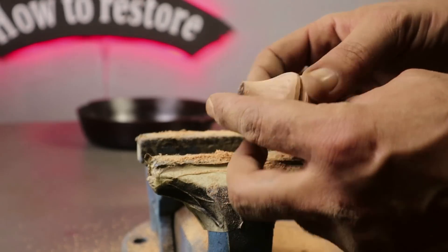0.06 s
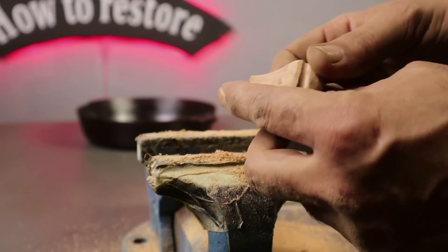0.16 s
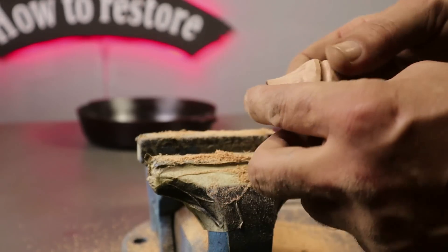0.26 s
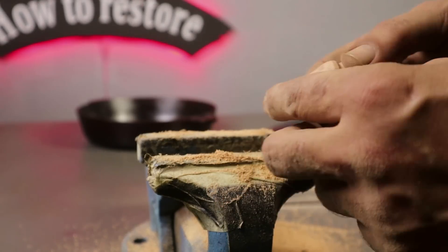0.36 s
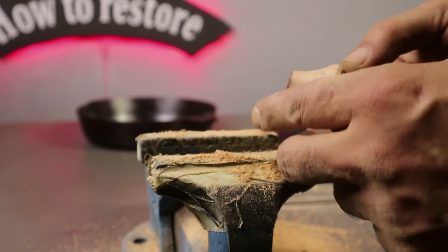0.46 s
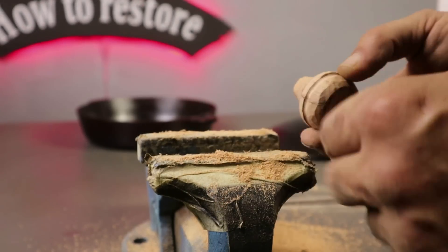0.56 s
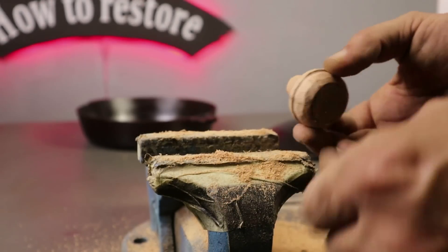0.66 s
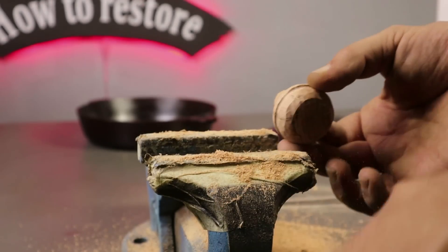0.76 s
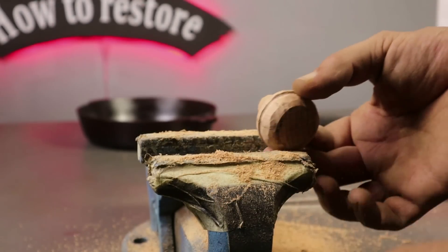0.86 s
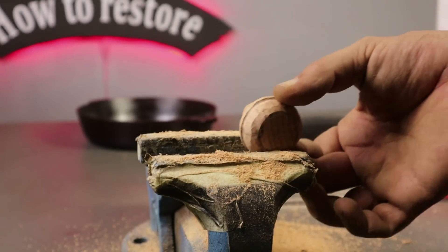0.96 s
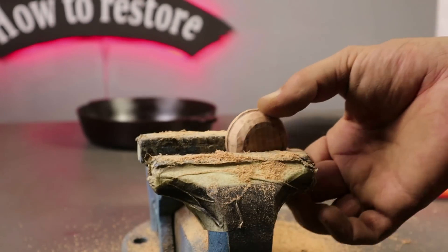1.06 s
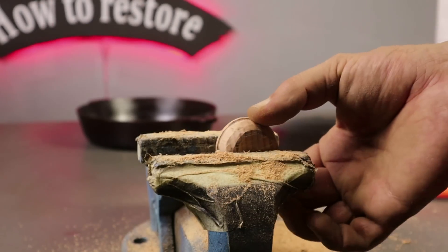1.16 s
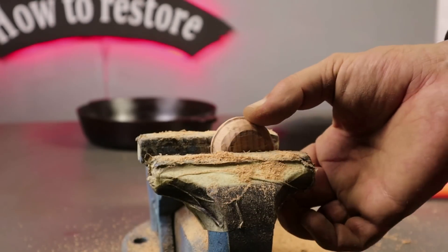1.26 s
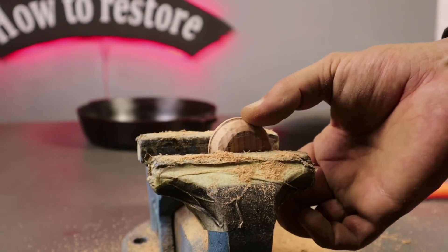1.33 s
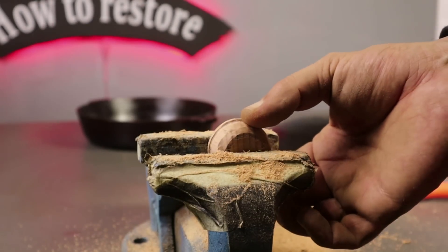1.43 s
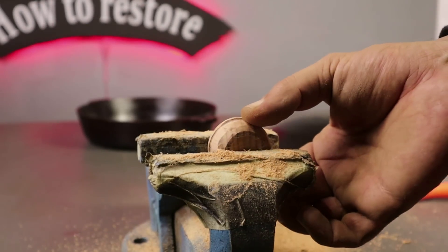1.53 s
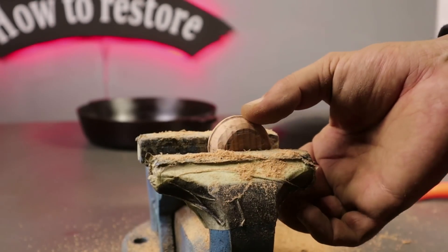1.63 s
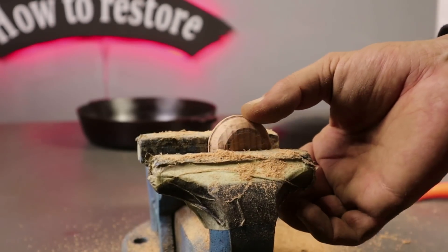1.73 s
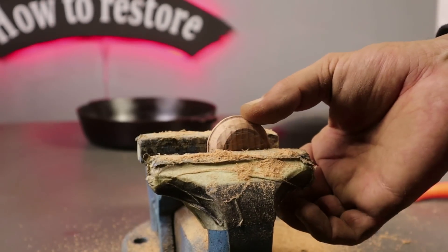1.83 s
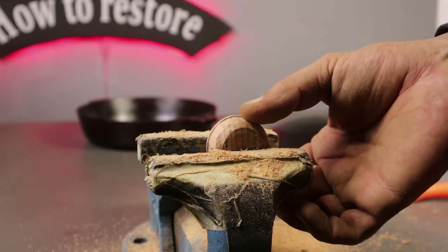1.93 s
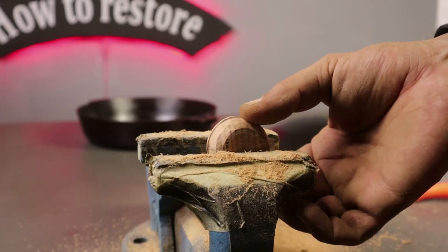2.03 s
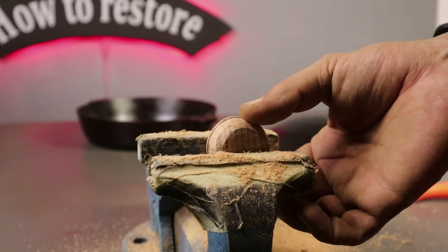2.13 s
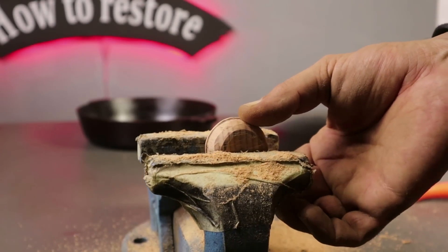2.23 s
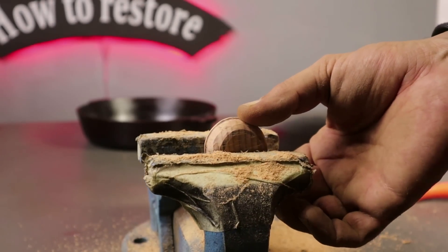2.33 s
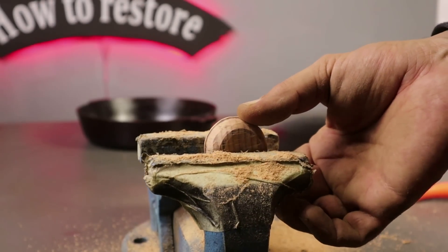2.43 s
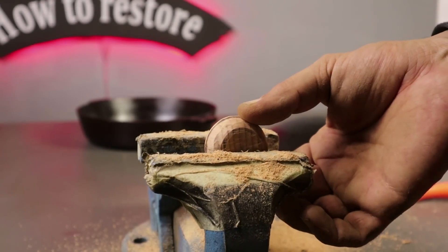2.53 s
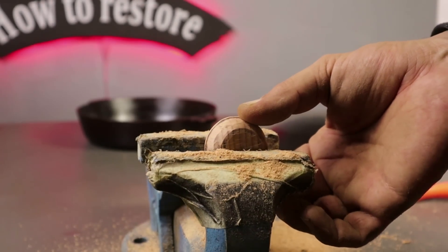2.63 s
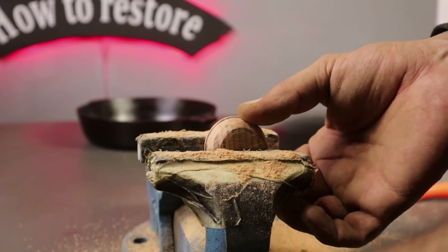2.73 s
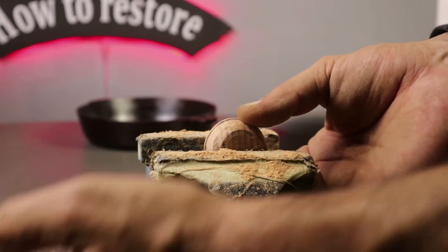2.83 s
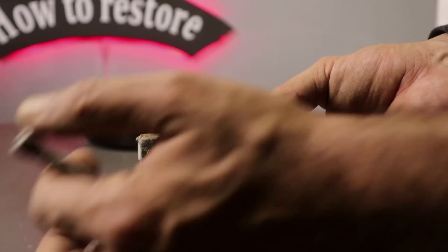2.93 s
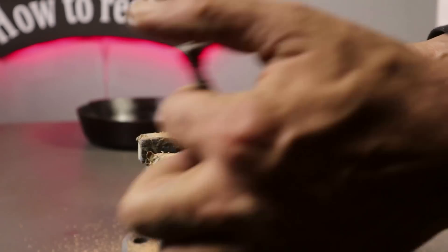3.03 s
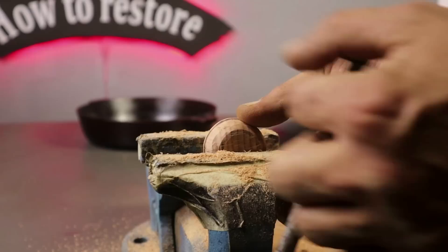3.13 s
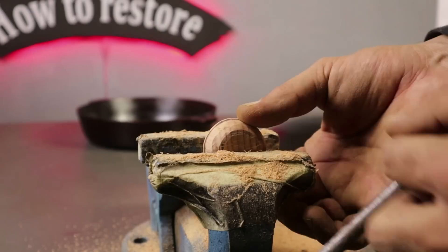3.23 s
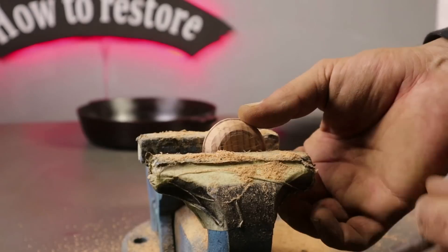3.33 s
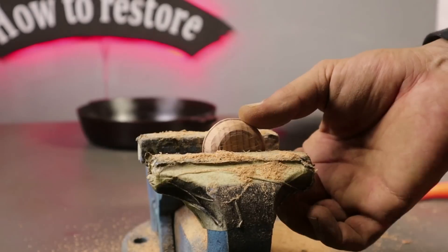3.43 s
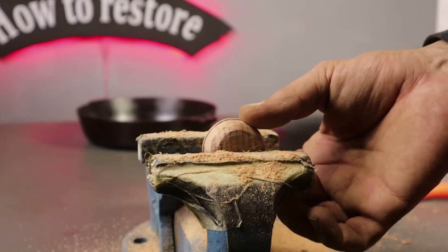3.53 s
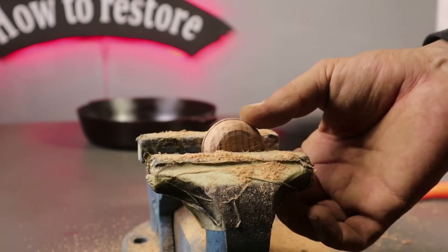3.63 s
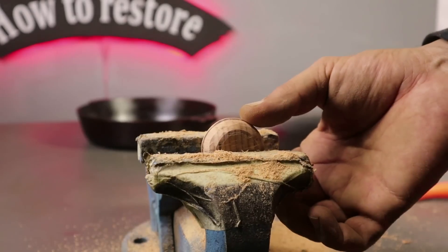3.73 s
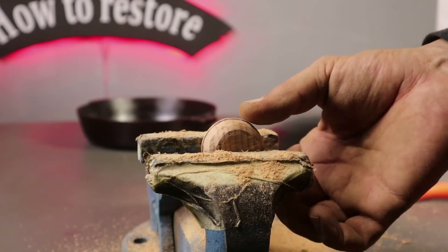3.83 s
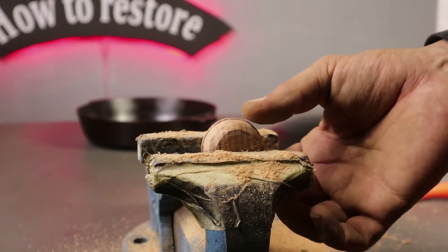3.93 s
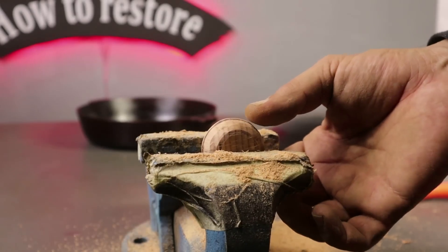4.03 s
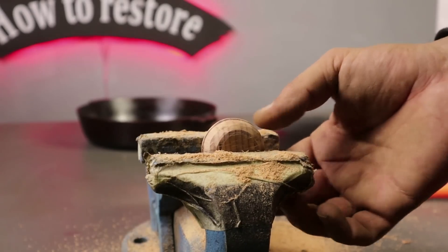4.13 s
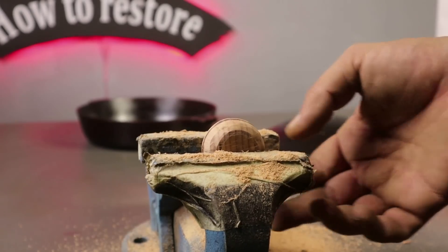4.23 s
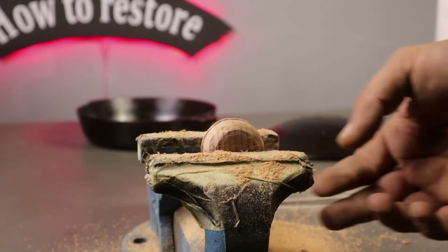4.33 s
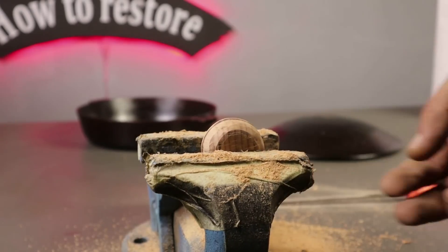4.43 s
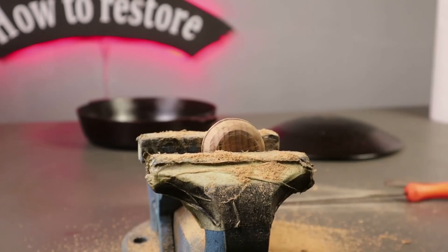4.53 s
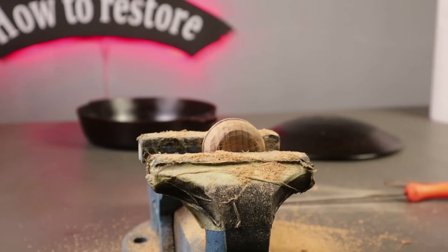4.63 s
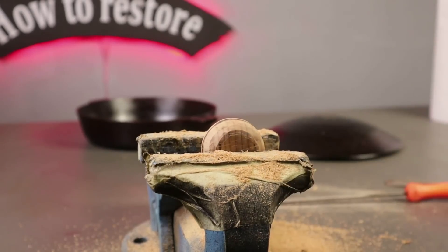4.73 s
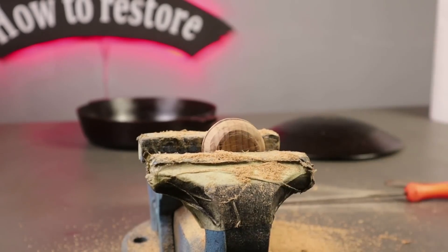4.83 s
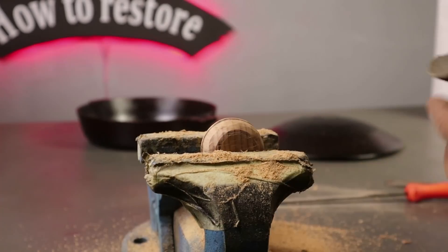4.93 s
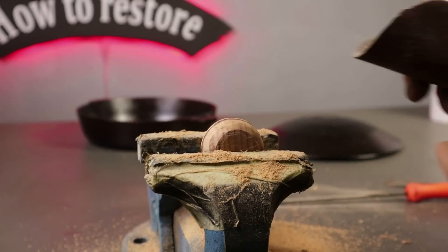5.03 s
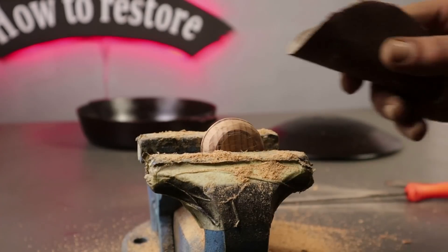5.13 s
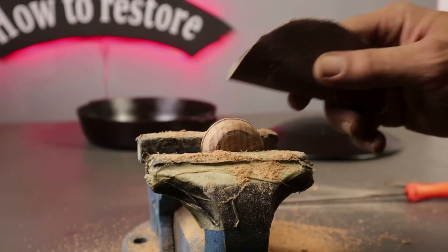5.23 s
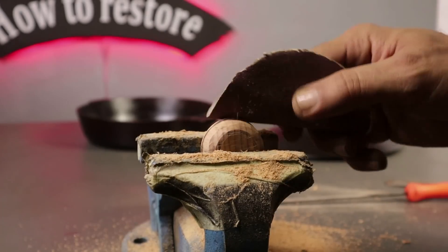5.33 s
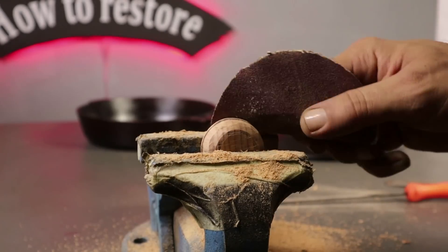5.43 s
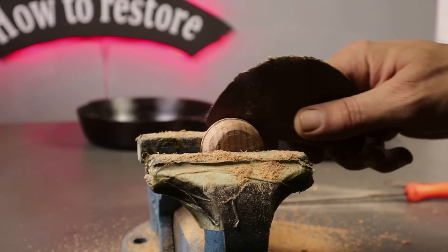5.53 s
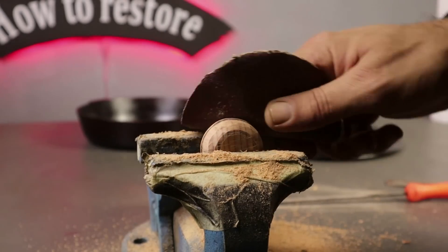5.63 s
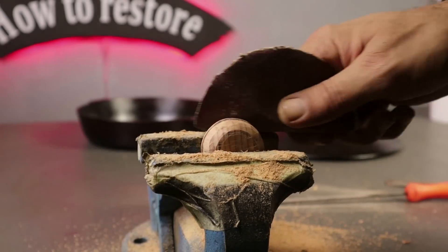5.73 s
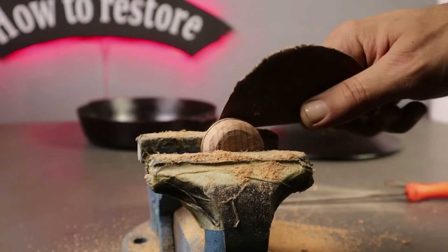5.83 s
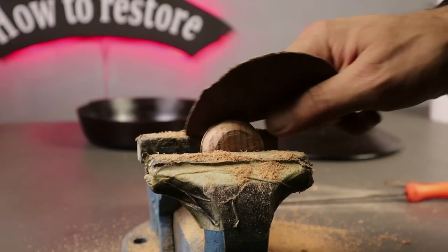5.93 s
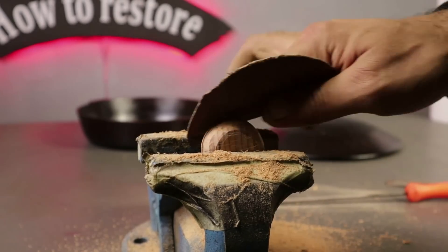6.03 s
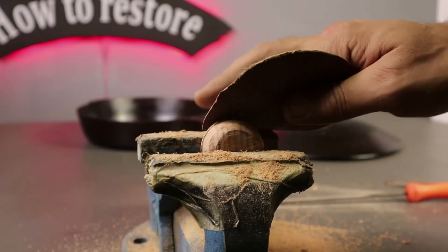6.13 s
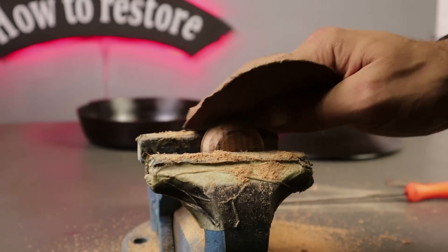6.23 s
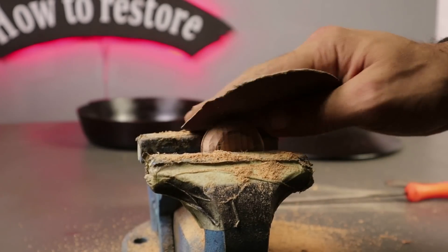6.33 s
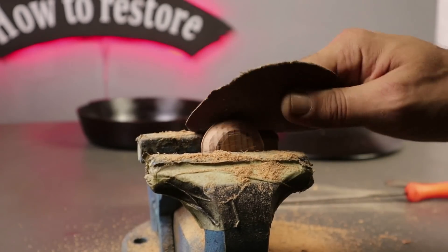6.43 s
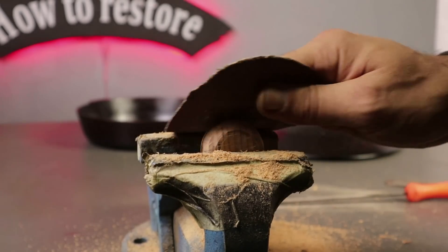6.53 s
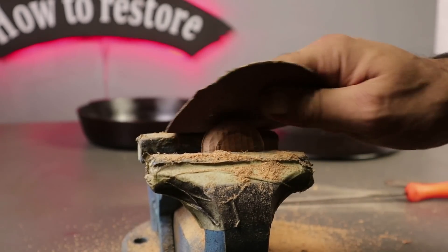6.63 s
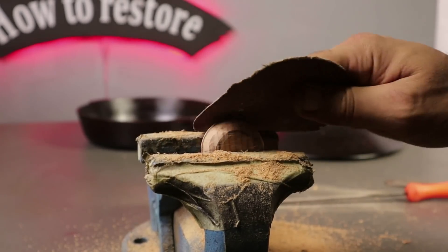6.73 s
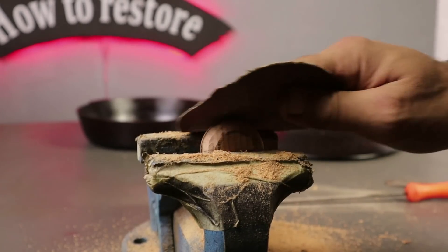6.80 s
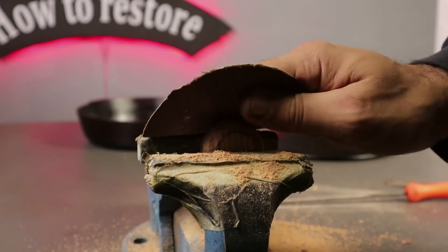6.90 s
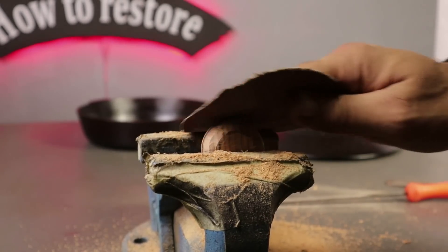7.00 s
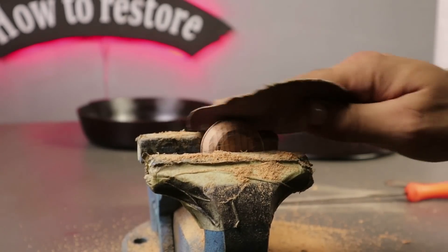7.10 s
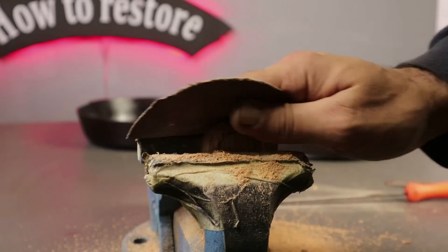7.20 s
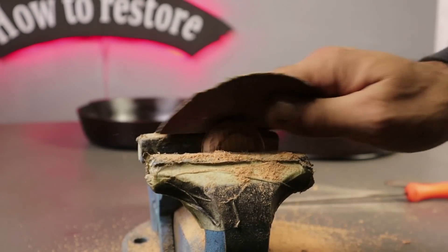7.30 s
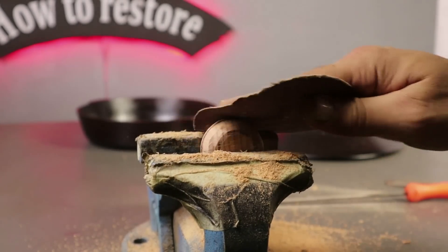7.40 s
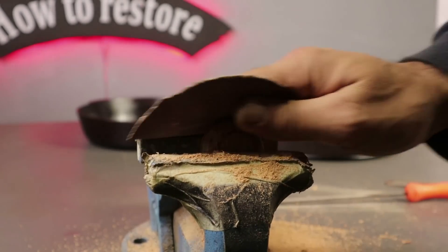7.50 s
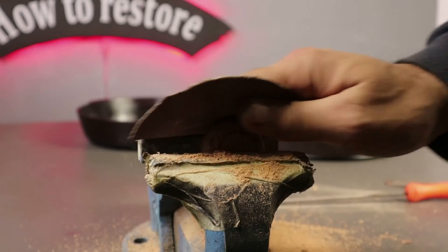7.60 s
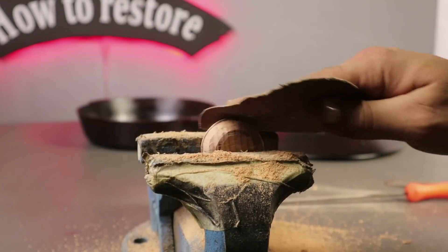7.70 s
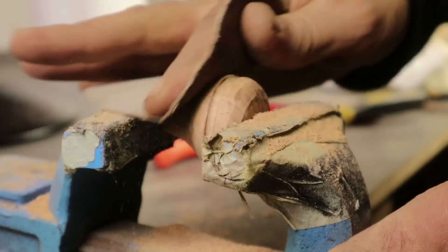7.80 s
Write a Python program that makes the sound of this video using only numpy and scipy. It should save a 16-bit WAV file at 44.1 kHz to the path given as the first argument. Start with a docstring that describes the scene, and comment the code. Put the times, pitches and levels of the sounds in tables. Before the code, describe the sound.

In a quiet workshop with a short echo, fingers brush faintly and a small wooden knob knocks lightly into a bench vise. The steel handle clunks several times as the jaws close, shaking the bench. After a pause, a stiff sanding disc is picked up and rubbed over the knob in quick, scratchy strokes with small papery snaps, close to the microphone.

```python
"""A workshop with a short echo, heard through one close microphone, rumbles and hisses quietly.
A low hum dies away after a second, as fingers brush about and a hand sweeps off with a thin squeak.
A small wooden knob is set in a bench vise. As the jaws are wound shut, the steel handle clunks
and the bench shudders. Near five seconds a sanding disc is picked up and laid on the knob, then
rubbed to and fro, about six strokes a second: its grains scratch the wood and make it ring."""
import sys
import numpy as np
from scipy import signal
from scipy.fft import rfft, irfft, next_fast_len
from scipy.io import wavfile
from scipy.ndimage import uniform_filter1d, map_coordinates

SR = 44100
rng = np.random.default_rng(int(sys.argv[2]) if len(sys.argv) > 2 else 0)


def output_pcm(signal):
    """Save a mono or channel-first signal as 16-bit PCM at the path in sys.argv[1].

    Samples are clipped to [-1, 1] before scaling.
    """
    pcm = np.clip(np.atleast_2d(signal).T, -1, 1) * 32767
    wavfile.write(sys.argv[1], SR, np.round(pcm).astype(np.int16))


N = 346626

# the notes at which the clamped knob and the jaws ring: f/Hz, width/Hz, level/dB
KNOB_RESONANCES = [(651, 16, 0), (842, 34, -7), (1158.5, 34, 6), (1230, 35, -10), (1553, 53, -3.5),
                   (1930, 31, -3.5), (2110, 41, -8), (2330, 27, -8), (2537, 25, -5), (2730, 39, -6.5),
                   (3340, 63, -9), (3440, 35, -22), (3650, 52, -12), (3850, 35, -7)]


def amp(db):
    """Turn decibels into a factor to multiply by."""
    return 10 ** (np.asarray(db) / 20)


def unit(x):
    """Scale a signal to an average size (rms) of 1."""
    return x / np.sqrt(np.mean(x ** 2) + 1e-20)


def along(points, hz):
    """Read between the rows of a (f/Hz, value) table, on a logarithmic frequency scale."""
    freqs, values = np.transpose(points)
    return np.interp(np.log(hz + 1), np.log(freqs + 1), values)


def filtered(x, response):
    """Multiply each frequency in x by response(hz)."""
    n = x.shape[-1]
    padded = next_fast_len(n + SR // 10)
    return irfft(rfft(x, padded) * response(np.fft.rfftfreq(padded, 1 / SR)), padded)[..., :n]


def coloured(x, spectrum):
    """Shape the tone of x with a (f/Hz, level/dB) table; the result has size 1."""
    return unit(filtered(x, lambda hz: amp(along(spectrum, hz))))


def resonant(x, modes):
    """Let x ring a set of (f/Hz, width/Hz, level/dB) resonances; the result has size 1."""
    def response(hz):
        return sum(amp(db) * 1j * hz * width / (centre ** 2 - hz ** 2 + 1j * hz * width)
                   for centre, width, db in modes)
    return unit(filtered(x, response))


def wobble(rate):
    """A smooth curve through `rate` random values a second."""
    return map_coordinates(rng.standard_normal(int(N * rate / SR) + 4), [np.arange(N) * rate / SR])


def add(track, start_s, sound):
    """Mix a sound into the track at the given time."""
    part = track[round(start_s * SR):][:len(sound)]
    part += sound[:len(part)]


def background():
    """The room's rumble eases off slowly under steady hiss; a wavering hum holds, then dies away."""
    # room rumble and microphone hiss: f/Hz, level/dB
    air_spectrum = [(12, -52), (20, -31), (26, -31), (49, -2.5), (119, -3), (185, -5.5), (219, -4.5),
                    (289, -8), (342, -14.5), (614, -19.5), (746, -22), (1070, -24.5), (1540, -25.5),
                    (2330, -28.5), (15500, -37.5)]
    rumble_fade_db_per_s, hum_fade_db_per_s = 0.43, 97
    hum_hz, hum_hold_s = 145.4, 0.87
    t = np.arange(N) / SR
    air = coloured(rng.standard_normal(N), air_spectrum)
    low = filtered(air, lambda hz: 1 / (1 + (hz / 500) ** 4))
    rumble = amp(-55 - rumble_fade_db_per_s * t + 0.9 * wobble(3.2)) * low
    hum_level = amp(-57 - hum_fade_db_per_s * np.maximum(t - hum_hold_s, 0) + 2.0 * wobble(13.8))
    hum_phase = 2 * np.pi * np.cumsum(hum_hz + 14 * wobble(45.1)) / SR
    return amp(-55.5) * (air - low) + rumble + hum_level * unit(np.sin(hum_phase))


def brushes():
    """Fingers, sleeve and paper rub lightly, each making a soft swell of noise in one band."""
    # middle t/s, half width/s, level/dB, centre f/Hz, bandwidth/Hz
    touches = [(.675, .027, -59, 8340, 1800), (.757, 0.017, -58.5, 8860, 6000),
               (.88, 0.091, -63.5, 8500, 7000), (3.39, .045, -59.5, 9300, 7000),
               (4.935, .026, -54, 1980, 2200), (5.123, .018, -54.5, 2800, 3000),
               (5.22, 0.044, -59.5, 1870, 330), (5.376, 0.014, -54, 1850, 390),
               (5.47, 0.056, -51, 1650, 900)]
    out, t = np.zeros(N), np.arange(SR // 2) / SR
    for middle, half_width, db, centre_hz, width_hz in touches:
        swell = np.exp(-((t - t.mean()) / half_width) ** 2 / 2)
        friction = resonant(rng.standard_normal(len(t)), [(centre_hz, width_hz, 0)])
        add(out, middle - t.mean(), amp(db) * swell * friction)
    return out


def room_echo(x):
    """The workshop's echo of x, in which each frequency dies at its own speed."""
    # how long the room rings: f/Hz, time to fade by 60 dB/s
    fade_times = [(100, 0.7), (260, 0.19), (700, 0.52), (1840, 0.31), (4850, 0.34), (14000, 0.19)]
    hz, t, noise = signal.stft(rng.standard_normal(SR * 3 // 4), SR, nperseg=256)
    tail = signal.istft(noise * amp(-60 * t / along(fade_times, hz)[:, None]), SR, nperseg=256)[1]
    tail = np.pad(tail, (round(.006 * SR), 0))  # the echo arrives 6 ms late
    return signal.fftconvolve(x, tail / np.linalg.norm(tail))[:len(x)]


def squeak():
    """A thin, rough squeak rises and falls in pitch as the hand sweeps away."""
    # the squeak's tones: top f/Hz, level/dB, half width/s
    tones = [(2700, -67, 0.033), (4530, -70, .035), (10300, -61, .06), (14700, -59, .025)]
    t = np.arange(N) / SR - .89  # time from the middle of the sweep
    speed = np.exp(-(t / 0.13) ** 2) * (1 + .007 * wobble(700))
    phase_per_hz = 2 * np.pi * np.cumsum(speed) / SR
    return sum(amp(db + 3.5 * wobble(90)) * np.exp(-(t / half_width) ** 2) * np.sin(hz * phase_per_hz)
               for hz, db, half_width in tones)


def blows():
    """Each clunk of the vise, or of the knob in its jaws, is followed by a softer, duller bounce."""
    # t/s, level/dB, hardness/Hz (above this the blow has little treble), knock f/Hz
    clunks = [(1.171, -48.5, 1400, 890), (1.398, -49.5, 1800, 1190), (1.424, -42, 2600, 1600),
              (1.449, -38.5, 3800, 1570), (1.461, -40.5, 2900, 455), (1.478, -40, 640, 442),
              (1.609, -45, 800, 560), (1.645, -49.5, 650, 477), (1.708, -55, 1200, 700),
              (2.068, -20.5, 3400, 1472), (2.082, -32, 565, 320), (2.128, -44, 6000, 1080),
              (2.654, -30, 1140, 780), (2.911, -34, 960, 760), (2.920, -36, 5130, 1110),
              (2.934, -35.5, 785, 510), (4.011, -50.5, 1150, 606), (4.025, -43.5, 430, 168),
              (4.189, -54.5, 1100, 1045)]
    delay_s, loss_db, hardness_share, pitch_share = .008, 4, .52, .88
    heaviest_db = max(row[1] for row in clunks)
    for start, db, hard_hz, knock_hz in clunks:
        yield start, db, hard_hz, knock_hz
        bounce_db = heaviest_db - loss_db + 1.26 * (db - heaviest_db)  # light taps hardly bounce
        yield start + delay_s, bounce_db, hard_hz * hardness_share, knock_hz * pitch_share


def vise():
    """Each blow shakes the bench and rings the steel; soft blows thump, hard ones clink."""
    # the bench's clatter after a blow: f/Hz, level/dB
    bench_spectrum = [(60, -18), (200, -11), (330, -1.5), (500, 3.5), (620, -2), (780, -1), (1200, -2.5),
                      (1900, -7), (3000, -9), (5000, -14.5), (8500, -21), (10500, -34), (16000, -50)]
    # its deep thump: f/Hz, level/dB
    thump_spectrum = [(30, -33), (70, -4), (120, -4), (180, 2.5), (290, -1.5), (450, -6), (1500, -44)]
    steel_wakes_hz, thump_db_per_octave = 1750, -5.5  # harder blows ring more and thump less
    out, t = np.zeros(N), np.arange(SR // 2) / SR
    fade = lambda seconds: amp(-60 * t / seconds)  # falls by 60 dB in this time
    for start, db, hard_hz, knock_hz in blows():
        contact = lambda hz: 1 / np.sqrt(1 + (hz / hard_hz) ** 4)  # how strongly hz is stirred
        noise = rng.standard_normal(len(t))
        bench = unit(filtered(noise, lambda hz: amp(along(bench_spectrum, hz)) * contact(hz)))
        # a short crack, the wooden body, then things lying on the bench that rattle on
        bench *= amp(1.5) * fade(0.016) + fade(0.063) + amp(-16) * fade(0.3)
        steel = amp(1.5) * contact(steel_wakes_hz) * steel_ring(t, contact, blur_hz=25.3)
        # the place that is struck has one short note of its own
        knock = amp(4) * fade(0.05) * np.sin(2 * np.pi * knock_hz * t)
        thump = coloured(rng.standard_normal(len(t)), thump_spectrum) * fade(0.21)
        thump *= 1 - np.exp(-t / 0.011)  # the heavy top takes a moment to start swinging
        thump *= amp(-3 + thump_db_per_octave * np.log2(hard_hz / 1000))
        attack = 1 - np.exp(-t / 0.00093)
        blow = amp(db) * attack * (bench + steel + knock + thump)
        # the broad bench top sends more sound into the room than the small steel parts
        add(out, start, blow + amp(-9.5) * room_echo(blow + amp(db - 2.5) * bench))
    return out


def steel_ring(t, contact, blur_hz):
    """The steel handle and screw ring; the loose parts chatter, which blurs each note."""
    # f/Hz, level/dB, time to fade by 60 dB/s
    steel_notes = [(1410, -2, 0.049), (1445, -7.5, 0.075), (1547, -6, 0.11), (2000, -8, 0.05),
                   (2316, -3, 0.058), (2600, -12, 0.13), (2800, -10, 0.095), (3230, -37, .14),
                   (4090, -16, 0.063), (5120, -13, 0.07), (5630, -4.5, 0.081), (6300, -30, .14)]
    hz, db, fade_s = np.transpose(steel_notes)[:, :, None]
    drift = np.cumsum(rng.standard_normal((len(hz), len(t))), axis=1) * np.sqrt(2 * np.pi * blur_hz / SR)
    size = amp(db + rng.normal(0, 1.6, hz.shape) - 60 * t / fade_s) * contact(hz)
    phase = 2 * np.pi * (hz * t + rng.random(hz.shape)) + drift
    return np.sum(size * np.sin(phase), axis=0)


def shudder():
    """The bench shudders deeply, in one slow swell, while the screw is wound."""
    middle_s, half_width_s = 2.5, 0.59
    swell = np.exp(-((np.arange(N) / SR - middle_s) / half_width_s) ** 2)
    low_noise = resonant(rng.standard_normal(N), [(103.4, 21, 0)])
    return amp(-55.5) * swell * resonant(low_noise, [(109, 41, 0)])


def catches():
    """The stiff disc taps the wood or catches on an edge: a short snap that also rings the knob."""
    # t/s, relative level/dB
    snaps = [(5.377, -40.5), (5.412, -34), (5.722, -41), (5.789, -52), (6.034, -34), (6.580, -43),
             (6.960, -31), (7.199, -32.5), (7.795, -34.5)]
    # the tone of the snapping paper: f/Hz, level/dB
    snap_spectrum = [(200, -22), (700, -17), (1300, 3), (2500, -6), (7500, -11), (10000, -20),
                     (16000, -25)]
    out, t = np.zeros(N), np.arange(SR // 10) / SR
    for start, db in snaps:
        snap = rng.standard_normal(len(t)) * amp(-60 * t / 0.019)
        paper = coloured(snap, snap_spectrum)
        knob = amp(-9.5) * resonant(snap, KNOB_RESONANCES)
        add(out, start, amp(db - 15) * (paper + knob))
    return out


def scratches(per_second, spread_db):
    """Sanding grains strike at random: tiny clicks of uneven size."""
    struck = rng.random(N) < per_second / SR
    return unit(struck * rng.standard_normal(N) * amp(spread_db * rng.standard_normal(N)))


def damped(level, limit_db):
    """The pressing hand holds vibration back: it grows with the level only up to a limit."""
    return level / np.sqrt(1 + (level / amp(limit_db)) ** 2)


def flexing(x, depth_db):
    """The disc bends as it moves, so random patches of its sound get louder and softer."""
    spectra = signal.stft(x, nperseg=256)[2]
    patches = uniform_filter1d(rng.standard_normal(spectra.shape), size=5, axis=0)  # across frequency
    patches = uniform_filter1d(patches, size=9, axis=1)  # across time
    return signal.istft(spectra * amp(depth_db * unit(patches)), nperseg=256)[1][:N]


def sanding():
    """The hand speeds up and turns back; faster grit sounds brighter, and the grains ring the knob."""
    # pull and push in turn: start t/s, length/s, relative level/dB, share of the length spent speeding up
    strokes = [(5.391, 0.21, -47.5, 0.22), (5.566, .2, -34, .6), (5.776, 0.16, -34.5, 0.25),
               (5.937, 0.2, -34.5, .22), (6.108, 0.14, -40.5, 0.21), (6.24, 0.16, -38, 0.36),
               (6.385, .15, -47, 0.63), (6.561, .14, -35, 0.41), (6.687, 0.16, -35, 0.51),
               (6.844, 0.18, -31, 0.43), (7.01, 0.16, -34.5, 0.39), (7.166, 0.17, -29, 0.53),
               (7.318, 0.18, -35, 0.48), (7.486, 0.18, -28, 0.49), (7.655, 0.19, -32, 0.33),
               (7.832, 0.13, -37, 0.34)]
    # the grit's bite and hiss compared with the rasp: t/s, bite level/dB, hiss level/dB
    grit_balance = [(5.6, -3, -6), (6.45, -5.5, -3.5), (6.7, -2, -10), (7.25, 4, 0), (7.8, 4, -3.5)]
    # rasp of the paper backing: f/Hz, level/dB
    rasp_spectrum = [(200, -47), (550, -18.5), (700, -7.5), (950, -7), (1100, 0), (1400, -5), (2150, 1),
                     (2800, -10), (4200, -15), (8000, -11.5), (16000, -42)]
    # bite of the grit into the wood: f/Hz, level/dB
    bite_spectrum = [(700, -31), (1800, -8), (2900, -2), (3600, 2), (4300, -3.5), (5200, 0), (6600, -12),
                     (9000, -23.5), (16000, -30)]
    # fine hiss of the grit: f/Hz, level/dB
    hiss_spectrum = [(1500, -23), (4200, -12.5), (6400, -5), (7500, -1), (8600, 0.5), (9400, -8),
                     (10200, -9), (11200, -12.5), (12500, -7.5), (16000, -15)]
    # the shaken bench: f/Hz, level/dB
    shake_spectrum = [(60, -22), (190, -1), (380, 1), (520, 2.5), (600, -11), (1000, -23), (3000, -50)]
    ring_growth_db_per_s = 1.35  # the knob rings more freely as the strokes go on
    t = np.arange(N) / SR
    rasp, bite, hiss, ring, shake = np.zeros((5, N))  # each layer's loudness over time
    balance_s, bite_db, hiss_db = np.transpose(grit_balance)
    for k, (start, length, db, rise) in enumerate(strokes):
        during = (t > start) & (t < start + length)
        progress = np.interp((t[during] - start) / length, [0, rise, 1], [0, .5, 1])
        speed = np.abs(np.sin(np.pi * progress))
        level = amp(db - 5)
        pull_db = 0 if k % 2 else 3.5  # the grit cuts harder on the pull
        middle = start + length / 2
        rasp[during] += level * speed ** 1.17
        bite[during] += level * amp(pull_db + np.interp(middle, balance_s, bite_db)) * speed ** 2.32
        hiss[during] += level * amp(pull_db + np.interp(middle, balance_s, hiss_db)) * speed ** 1.8
        ring_db = -5 + ring_growth_db_per_s * (start - strokes[0][0])
        ring[during] += amp(ring_db) * damped(level * amp(pull_db), limit_db=-34.5) * speed ** 0.92
        shake[during] += amp(-12.5) * damped(level, limit_db=-41) * speed ** 0.61
    backing = rasp * coloured(scratches(per_second=12000, spread_db=3.5), rasp_spectrum)
    cutting = bite * coloured(scratches(per_second=16000, spread_db=3.0), bite_spectrum)
    grit = hiss * coloured(scratches(per_second=22000, spread_db=0.0), hiss_spectrum)
    knob = ring * resonant(scratches(per_second=9000, spread_db=3.0), KNOB_RESONANCES)
    bench = shake * coloured(rng.standard_normal(N), shake_spectrum)
    paper = flexing(backing + cutting + grit, depth_db=2.0)
    # the paper grips and lets go unevenly over the wood's grain
    grip = amp(1.08 * wobble(35) + 0.76 * wobble(220))
    return grip * (paper + knob + bench)


def scene():
    """All the sounds meet in one microphone; a faint noise makes the two channels differ very slightly."""
    # each channel's own noise: f/Hz, level/dB
    channel_spectrum = [(30, -5), (90, -9.5), (300, 1.5), (700, 0), (2000, -1.5), (8000, 0), (15000, -2)]
    hand = sanding() + catches() + brushes() + squeak()
    mono = hand + amp(-11) * room_echo(hand) + vise() + shudder() + background()
    return mono + amp(-60.5) * coloured(rng.standard_normal((2, N)), channel_spectrum)


def record(dry):
    """Cut off the very highest treble."""
    return filtered(dry, lambda hz: hz < 15850)


dry = scene()
out = record(dry)
output_pcm(out)
```